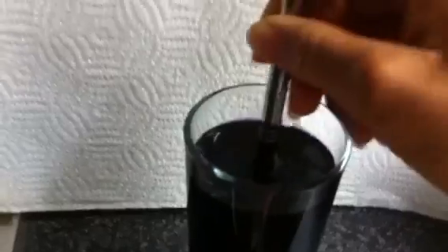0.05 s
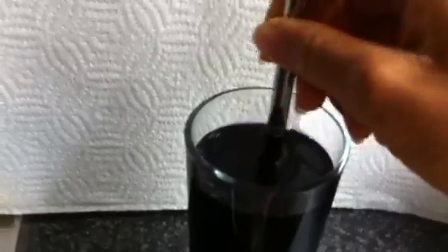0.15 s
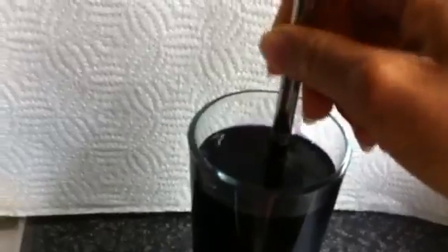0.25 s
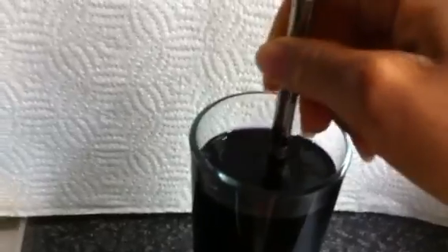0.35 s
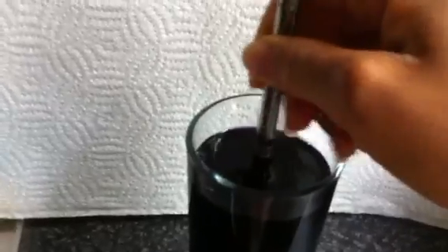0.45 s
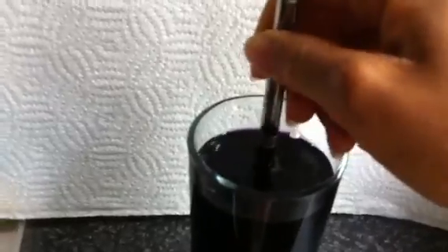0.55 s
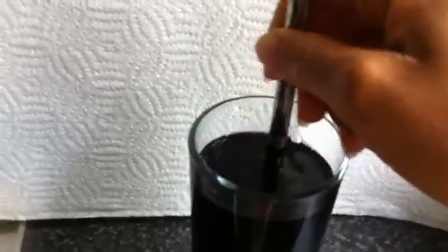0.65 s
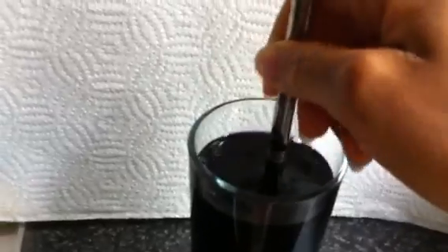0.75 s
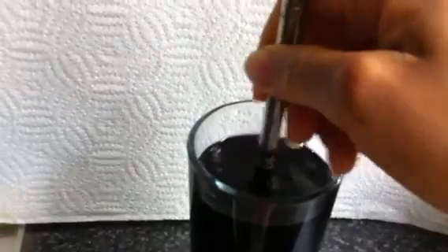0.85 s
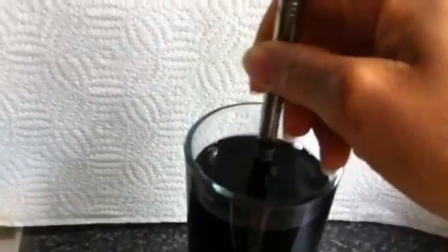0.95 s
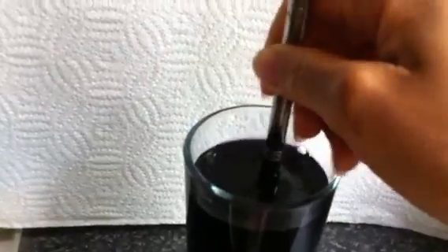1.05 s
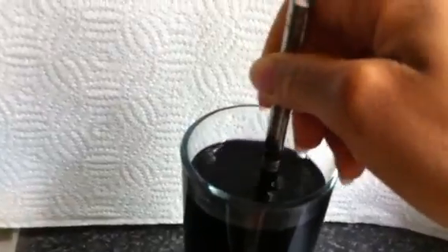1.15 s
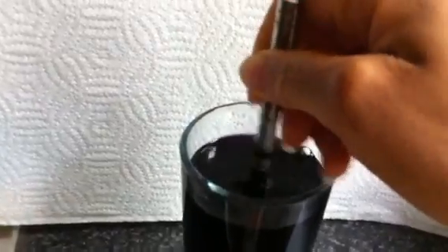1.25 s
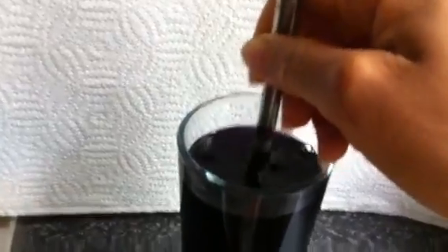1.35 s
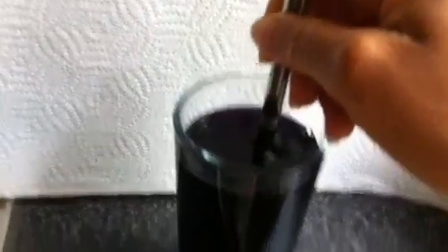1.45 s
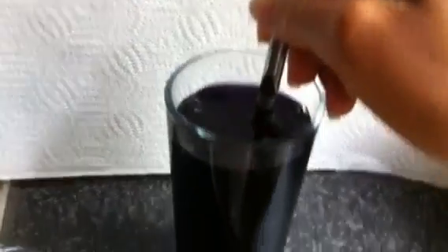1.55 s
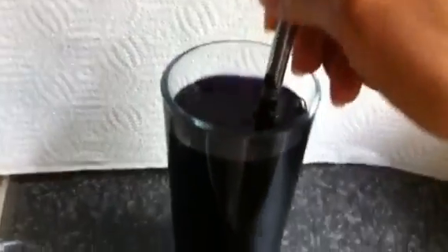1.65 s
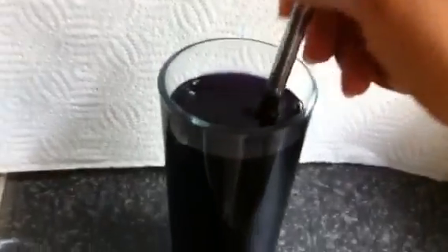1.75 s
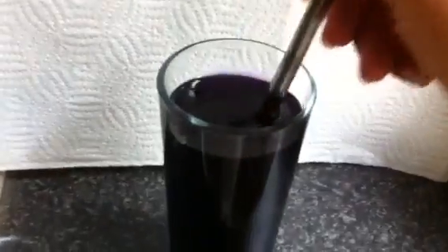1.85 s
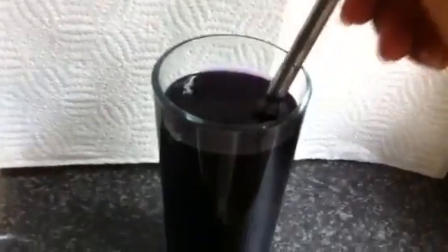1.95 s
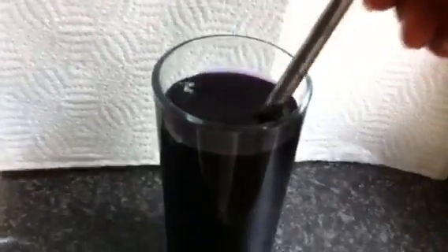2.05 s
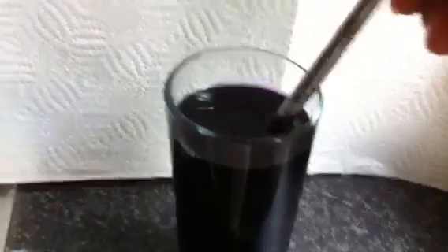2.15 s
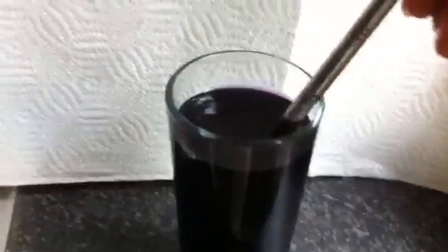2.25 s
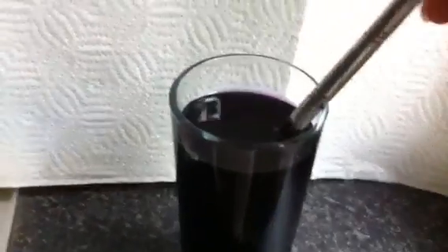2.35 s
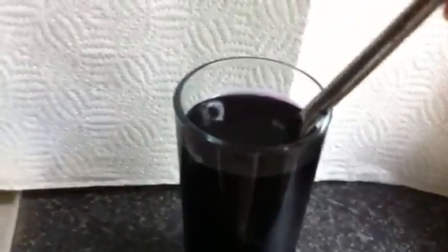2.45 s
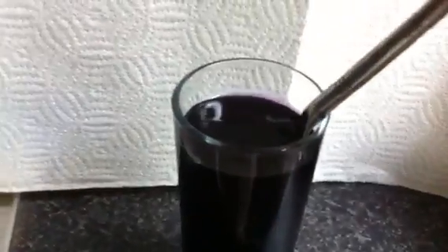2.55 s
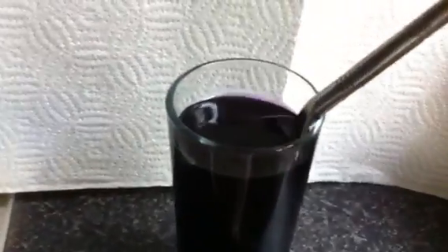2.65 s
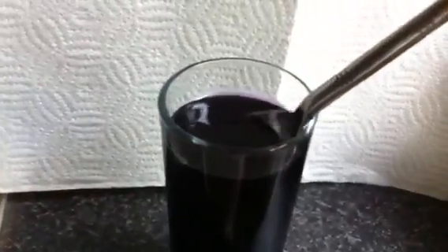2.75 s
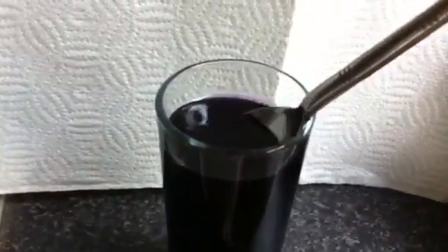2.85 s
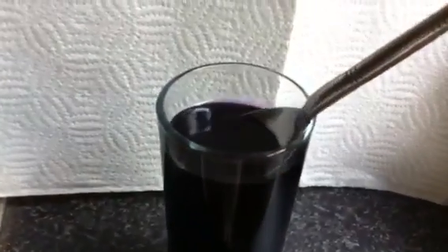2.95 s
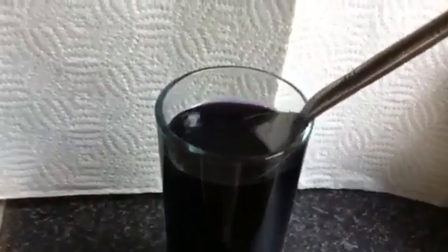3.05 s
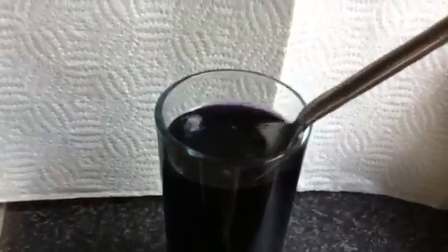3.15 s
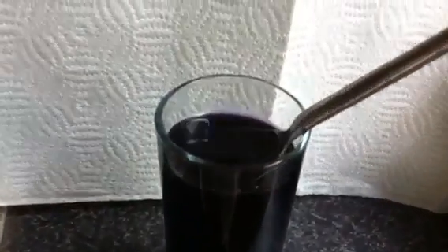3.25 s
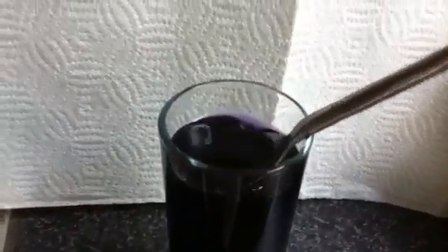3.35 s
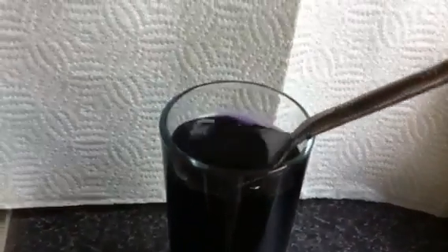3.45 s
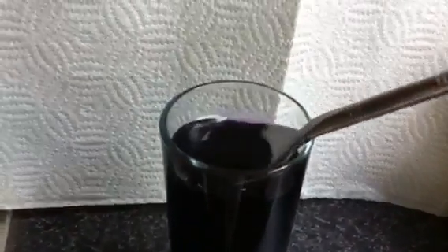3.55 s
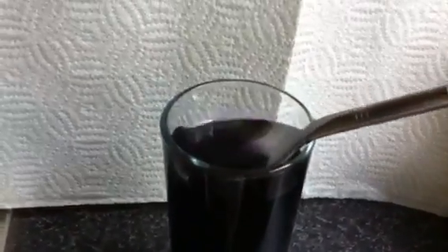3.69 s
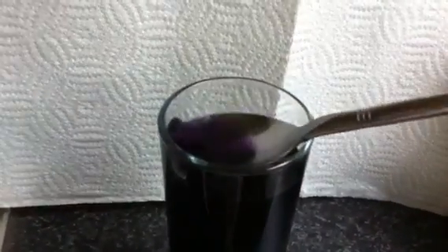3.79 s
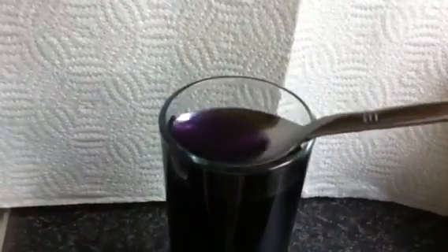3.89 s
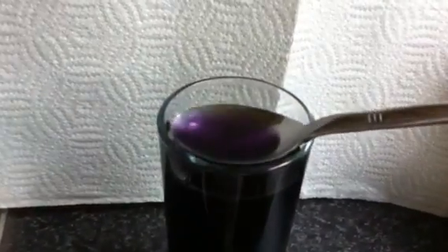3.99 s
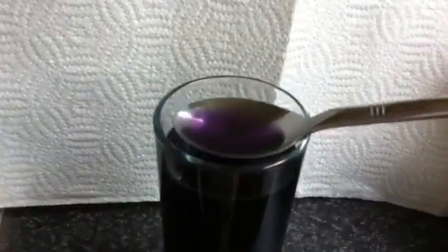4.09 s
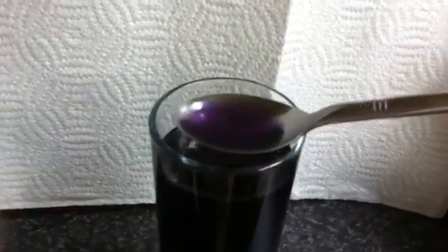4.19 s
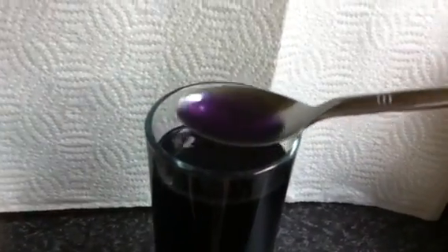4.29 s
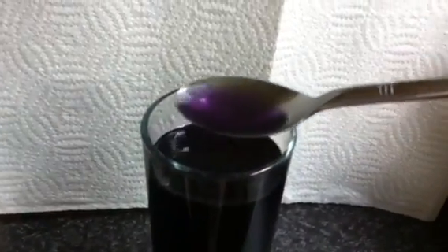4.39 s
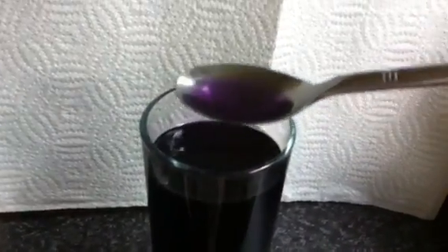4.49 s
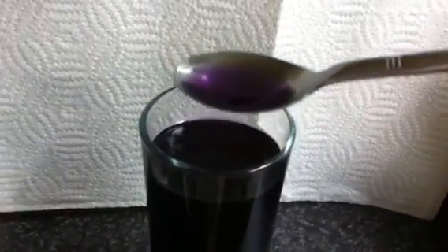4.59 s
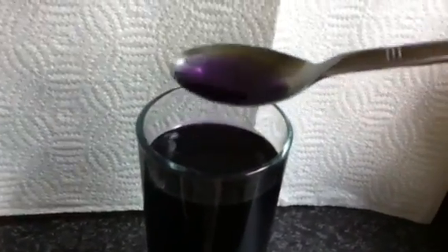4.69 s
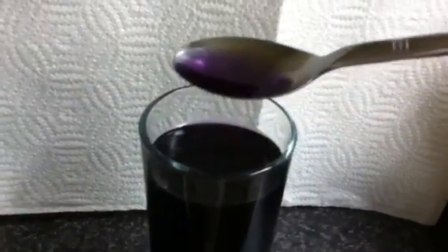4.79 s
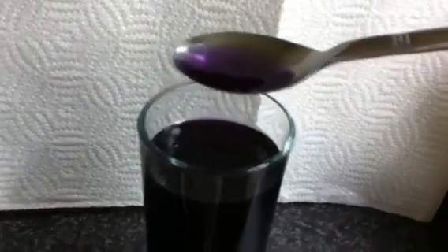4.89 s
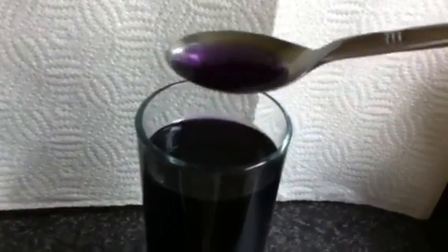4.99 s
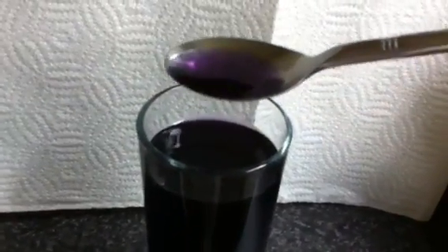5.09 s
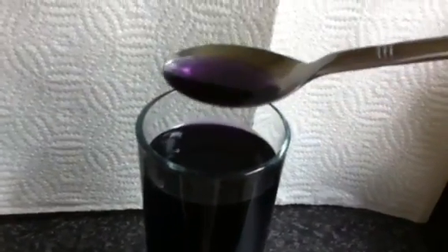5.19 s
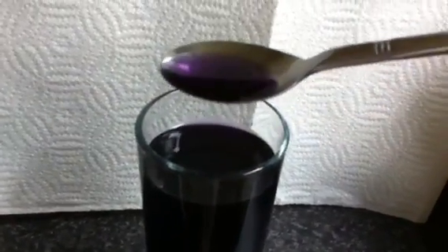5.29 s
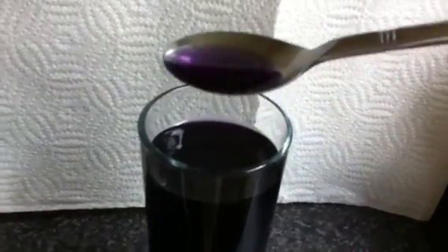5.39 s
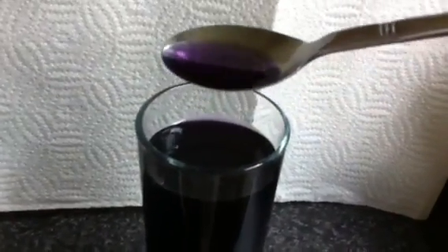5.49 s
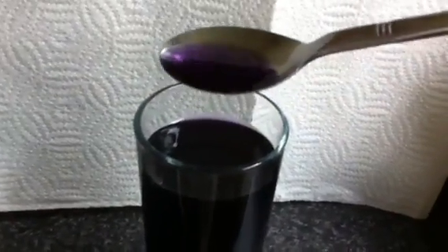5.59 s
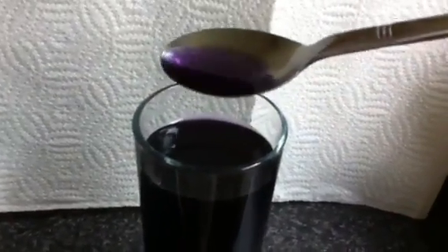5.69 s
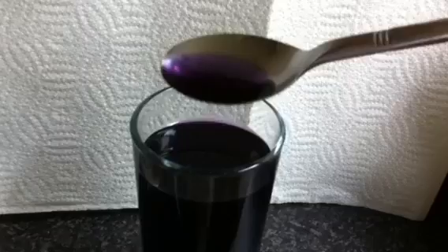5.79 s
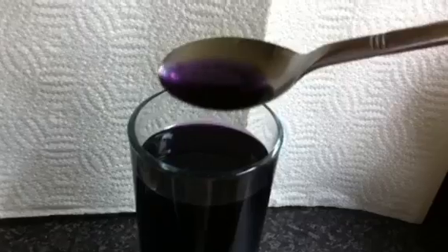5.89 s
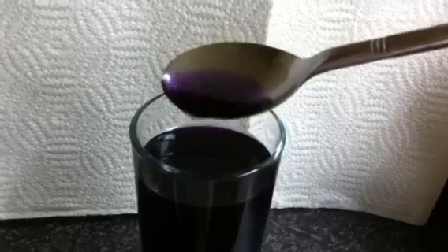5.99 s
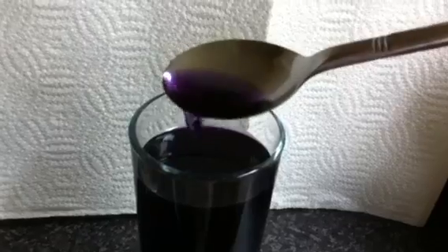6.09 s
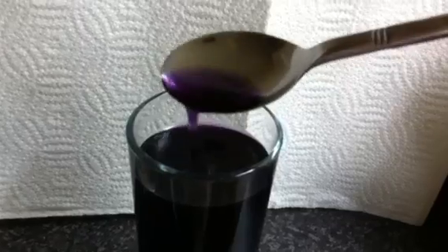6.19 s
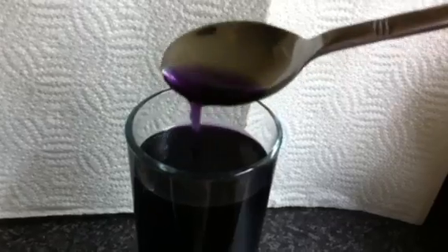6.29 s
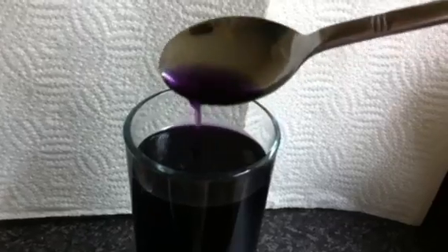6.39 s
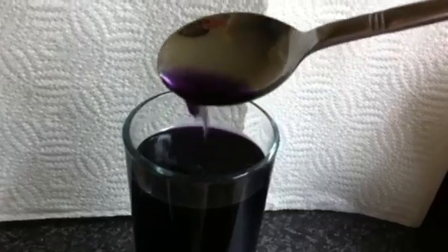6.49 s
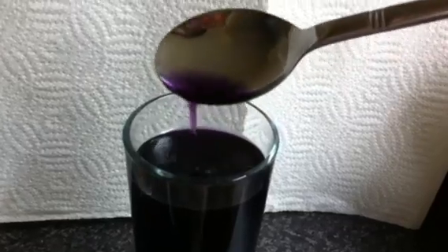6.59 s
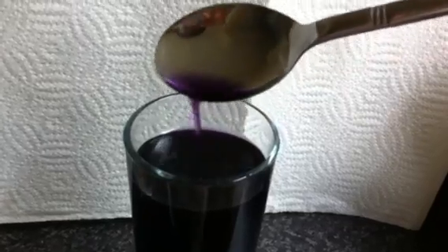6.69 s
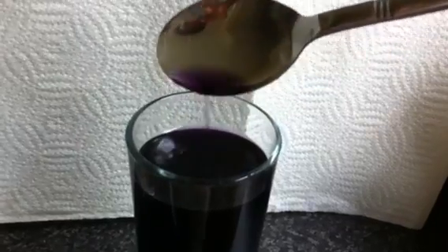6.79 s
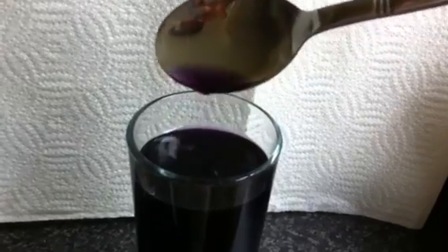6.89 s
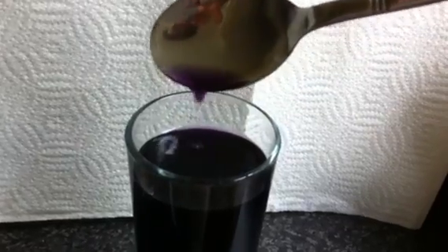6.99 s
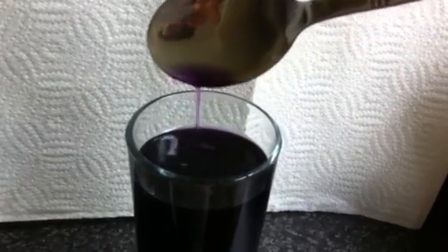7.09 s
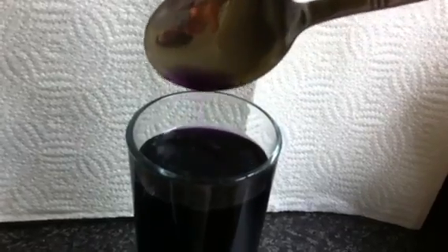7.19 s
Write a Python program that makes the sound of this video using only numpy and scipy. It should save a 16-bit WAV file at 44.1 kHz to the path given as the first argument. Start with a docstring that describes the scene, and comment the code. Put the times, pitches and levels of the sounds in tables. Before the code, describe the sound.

A metal spoon stirs a full glass with bright, quick clinks and scuffs, taps the rim as it lifts out, then three small drops plip.

```python
"""A steel spoon stirs a full drinking glass on a kitchen counter: each turn gives a clear clink and damped scuffs.
It is drawn out with soft swishes, tapping the rim; glass and bowl ring higher as the liquid sinks.
A soft bump follows, then three drops into the glass, each a splash and a rising bubble.
Glass and steel are damped modes, with filtered noise for contact. A small quiet room murmurs and hisses."""
import sys
import numpy as np
from scipy import signal
from scipy.fft import rfft, irfft, next_fast_len
from scipy.io import wavfile
from scipy.ndimage import map_coordinates

SR = 44100
rng = np.random.default_rng(int(sys.argv[2]) if len(sys.argv) > 2 else 0)


def int16_out(signal):
    """Quantize to a 16-bit WAV file."""
    q = np.round(np.clip(np.atleast_2d(signal).T, -1, 1) * 32767)
    wavfile.write(sys.argv[1], SR, q.astype(np.int16))


N = 319409
T = np.arange(SR) / SR  # one second, the length of every single sound

# free blows on the wall: start_s, force_db, low_mode_db
CLINKS = [(0.082, -6.5, -28.5), (0.5973, 1.5, -20), (1.0009, 6.5, -21), (1.4122, 0.5, -23)]
# spoon catches on the wall, slips, catches again: start_s, force_db, slip_s, second_force_db
DRAGS = [(0.294, 0.5, 0.037, -2), (0.727, -2.5, 0.034, 3.5), (1.150, -0.5, .030, 0.5),
         (1.531, 0.5, .065, -2.5)]
# spoon tip meets the thick base: start_s, force_db, high_mode_db
BUMPS = [(0.001, 1.5, -55), (0.445, 0, -36), (0.888, 1, -35.5), (1.243, -1.5, -34), (1.634, -0.5, -43)]
# taps on the rim: start_s, force_db, wall_ring_db, steel_ring_db
TAPS = [(2.364, 0, -27, -32), (2.428, -8, -25, -40), (2.481, -1.5, -47, -38), (2.515, -9, -35.5, -50.5),
        (2.630, -19.5, -44, -56.5), (2.668, -24, -53.5, -68), (3.285, -48, -64.5, -79),
        (3.521, 0.5, -44, -35.5), (3.655, -42, -66, -65), (3.940, 1, -45.5, -32), (4.195, -36.5, -65, -72)]
# glass wall, two singing modes and then overtones: pitch_hz, level_db, t60_s
GLASS_MODES = [(2255, 0, .55), (5426, 0, .26), (2405, -7, .16), (3208, -13, .09), (4775, -22, .15),
               (5470, -3, .14), (5790, -12, .16), (6160, -4, .12), (6225, 1, .13), (7866, -6, .13),
               (8525, 1, .14), (8715, -4, .18), (10305, -6, .18), (10483, -6, .18), (10660, -8, .13),
               (10960, -15, .15), (11450, -19, .15), (12315, -8, .2), (12443, -9, .2), (13175, -11, .14),
               (13410, -11, .13), (15250, -18, .12)]
# bending of the spoon handle: pitch_hz, level_db, t60_s
HANDLE_MODES = [(331.8, -5, .42), (343.1, -3, 0.15), (440, -10, .22)]
# worktop under the glass: pitch_hz, level_db, t60_s
COUNTER_MODES = [(138, -1, 0.32), (175.3, -7.5, 0.23), (242, -8, 0.28)]
# relative spectrum of the contact noise: frequency_hz, level_db
CRACK_SPECTRUM = [(100, -50.5), (700, -8), (1100, -3.5), (1500, 7.5), (1750, -3.5), (2300, 10.5),
                  (3000, -3.5), (4000, -9.5), (6200, -1), (7200, -1), (8500, 2), (9400, -12), (12500, -8),
                  (16000, -20)]
# relative spectrum of the dull knock: frequency_hz, level_db
KNOCK_SPECTRUM = [(25, -36.5), (105, -24.5), (132, -2.5), (200, -10), (290, -3.5), (440, 1.5), (610, 0.5),
                  (780, -10), (1300, -20), (3000, -46), (8000, -89.5)]


def amp(db):
    """Decibels to gain."""
    return 10 ** (np.asarray(db) / 20)


def unit(x):
    """Scale to rms 1."""
    return x / np.sqrt(np.mean(x ** 2) + 1e-20)


def along(points, hz):
    """Interpolate (Hz, value) points on a log frequency axis."""
    point_hz, values = np.transpose(points)
    return np.interp(np.log(hz + 1), np.log(point_hz), values)


def fade(t60_s):
    """Exponential decay, 60 dB down at t60_s."""
    return np.exp(-np.log(1000) * T / t60_s)


def swell(rise_s):
    """Soft start, an exponential approach to 1."""
    return 1 - np.exp(-T / rise_s)


def add(track, start_s, sound):
    """Mix a sound into the track at start_s."""
    start = max(round(start_s * SR), 0)
    track[start:start + len(sound)] += sound[:N - start]


def noise(spectrum, size=SR):
    """Coloured noise of rms 1."""
    hz = np.fft.rfftfreq(size, 1 / SR)
    white = rfft(rng.standard_normal(size))
    return unit(irfft(white * amp(along(spectrum, hz)), size))


def ring(modes, pitch=1, spread_db=2):
    """Damped modes whose balance scatters as the striking spot varies."""
    hz, db, t60_s = np.transpose(modes)[:, :, None]
    t = T[:SR // 2]
    gain = amp(db + spread_db * rng.standard_normal(db.shape)) / np.linalg.norm(amp(db))
    waves = gain * np.sin(2 * np.pi * hz * pitch * t) * np.exp(-np.log(1000) * t / t60_s)
    return np.pad(waves.sum(0), (0, SR - len(t)))


def chatter(modes, width_hz, t60_s, grain):
    """Steel rattling on glass: tiny uneven impacts into modes that the contact broadens."""
    f = np.fft.rfftfreq(SR, 1 / SR)
    body = sum(amp(db) * 1j * f * width_hz / (hz * hz - f * f + 1j * f * width_hz)
               for hz, db, _ in modes)
    body_rms = np.sqrt(np.mean(abs(body) ** 2))
    # impact strength steps every 30 samples
    sizes = np.exp(grain * rng.standard_normal(SR // 30 + 1)).repeat(30)[:SR]
    impacts = unit(rng.standard_normal(SR) * sizes)
    return irfft(rfft(impacts * fade(t60_s)) * body / body_rms, SR)


def sing(mode, rise_s, twin_db, beat_hz, pitch=1):
    """A mode swells and beats with its twin, as nothing is quite symmetric."""
    hz, db, t60_s = mode
    phase = 2 * np.pi * hz * pitch * T
    drift = 2 * np.pi * beat_hz * (1 + 0.16 * rng.standard_normal()) * T
    pair = np.sin(phase) + amp(twin_db) * np.sin(phase + drift)
    return amp(db) * pair * fade(t60_s) * swell(rise_s)


def room(x, wet_db, near_db):
    """Add eight early reflections from counter and wall, and a tail whose decay varies with frequency."""
    # tail decay: frequency_hz, t60_s
    tail_decay = [(150, .5), (500, .42), (2300, 0.29), (6000, .28), (14000, 0.12)]
    hz, t, z = signal.stft(rng.standard_normal(SR // 2), SR, nperseg=256)
    decay = np.exp(-np.log(1000) * t / along(tail_decay, hz)[:, None])
    tail = signal.istft(z * decay, SR, nperseg=256)[1]
    tail = np.pad(tail / np.linalg.norm(tail), (SR // 150, 0))
    response = amp(wet_db) * tail
    arrivals = rng.integers(SR // 600, SR // 60, size=8)
    response[arrivals] += amp(near_db) * rng.choice([-1, 1], size=8)
    return x + signal.fftconvolve(x, response)[:len(x)]


def until_touched(start_s, t60_s=0.039):
    """The next touch of the spoon stops the wall's ring."""
    touches = [row[0] for row in CLINKS + DRAGS + BUMPS + TAPS]
    touches = np.array(touches + [drag_s + slip_s for drag_s, _, slip_s, _ in DRAGS])
    free_s = np.min(touches[touches > start_s] - start_s, initial=1)
    return np.exp(-np.log(1000) * np.maximum(T - free_s, 0) / t60_s)


def clinks():
    """The spoon strikes and rebounds, so the glass rings freely; force goes mostly into the high singing mode."""
    out = np.zeros(N)
    for start_s, force_db, low_db in CLINKS:
        low = amp(low_db) * sing(GLASS_MODES[0], rise_s=0.015, twin_db=-6, beat_hz=2.4)
        # the wall loses energy fast while the steel still touches it
        contact = 1 + amp(-2) * fade(0.05)
        high = sing(GLASS_MODES[1], rise_s=0.003, twin_db=-8.5, beat_hz=3.57)
        high = amp(-15.5 + force_db) * contact * high
        overtones = amp(-4.0) * ring(GLASS_MODES[2:], spread_db=0.5)
        overtones += amp(1.5) * chatter(GLASS_MODES[2:], width_hz=59, t60_s=0.038, grain=0.37)
        crack = amp(-8) * noise(CRACK_SPECTRUM) * fade(0.026)
        knock = noise(KNOCK_SPECTRUM) * fade(0.075) + amp(-1.5) * ring(HANDLE_MODES)
        knock = amp(-39.5 + 0.25 * force_db) * knock * swell(0.002)
        strike = amp(-18.5 + 0.3 * force_db) * (overtones + crack) + knock
        add(out, start_s, room((low + high) * until_touched(start_s), wet_db=-17.5, near_db=-32))
        add(out, start_s, room(strike, wet_db=-6.0, near_db=-20))
    return out


def scuffs():
    """A drag bends the handle and its second catch is more damped; a bump goes down into the counter."""
    out = np.zeros(N)
    for start_s, force_db, slip_s, second_db in DRAGS:
        add(out, start_s, scuff(start_s, force_db, treble_db=-25.5, low_db=-36.0, high_db=-30.5,
                                knock_db=-43.0, handle_db=-30.5, beat_hz=7.9))
        second_s = start_s + slip_s
        add(out, second_s, scuff(second_s, second_db, treble_db=-28.5, low_db=-32.0, high_db=-47.5,
                                 knock_db=-47, handle_db=-41.5, beat_hz=11.0))
    for start_s, force_db, high_db in BUMPS:
        add(out, start_s, scuff(start_s, force_db, treble_db=-29.5, low_db=-41.0, high_db=high_db,
                                knock_db=-35.0, handle_db=-48.5, beat_hz=6.5))
    return out


def scuff(start_s, force_db, treble_db, low_db, high_db, knock_db, handle_db, beat_hz):
    """The spoon stays on the wall: it chatters, loads the glass and sets its own handle humming."""
    # spoon pressed to the wall under the liquid: pitch_hz, level_db, t60_s
    wedged_modes = [(1085, -12, 0.41), (1985.5, -9, 0.2), (2408, -7.5, .1), (3210, -14, 0.33),
                    (4740, -16, .2), (5170, -4.5, 0.12), (6200, -1, 0.076), (6100, -3.5, 0.048),
                    (8350, 0.5, 0.0993), (8680, 5, 0.051), (10130, 1, .13), (10600, -2.5, 0.033),
                    (12700, -1, .12), (12410, -3.5, .1), (13300, -9.5, 0.11), (14130, -13, .12),
                    (15600, -14, .1)]
    low = amp(low_db) * sing(GLASS_MODES[0], rise_s=0.012, twin_db=-5, beat_hz=beat_hz)
    high = sing(GLASS_MODES[1], rise_s=0.001, twin_db=-10, beat_hz=-22, pitch=0.999)
    high = amp(high_db + force_db) * high
    handle = amp(handle_db + force_db) * ring(HANDLE_MODES, spread_db=2.5) * swell(0.0058)
    # every point of contact shifts each mode differently
    detune = 1 + 0.006 * rng.standard_normal((len(wedged_modes), 1))
    drag = chatter(wedged_modes, width_hz=150, t60_s=0.085, grain=0.8)
    rattle = amp(-7) * ring(wedged_modes, pitch=detune, spread_db=5) + amp(-4) * drag
    # uneven slipping, 300 random levels per second, smoothly joined
    slips = np.exp(0.5 * map_coordinates(rng.standard_normal(304), [300 * T]))
    scrape = amp(-8.0) * noise(CRACK_SPECTRUM) * unit(slips) * fade(0.07)
    knock = noise(KNOCK_SPECTRUM) * fade(0.17) + amp(-8.5) * ring(COUNTER_MODES)
    knock = amp(knock_db) * knock
    singing = room((low + high) * until_touched(start_s) + handle, wet_db=-11.5, near_db=-26.0)
    treble = amp(treble_db) * (rattle + scrape) * until_touched(start_s, t60_s=0.02)
    contact = room((treble + knock) * swell(0.0016), wet_db=-11, near_db=-22.0)
    return singing + amp(force_db) * contact


def taps():
    """The spoon knocks and bounces on the rim; as it leaves, the liquid sinks and glass and bowl ring higher."""
    # spoon bowl clear of the liquid, main mode first: pitch_hz, level_db, t60_s
    bowl_modes = [(5942, 5, 0.13), (4450, -22, 0.21), (6115, -2, 0.071), (6540, -8, 0.044),
                  (7330, -5.5, 0.043), (7461, -16, .15), (8770, -10.5, .13), (8810, -7, 0.2),
                  (10400, -13, 0.098), (10000, -25, .1), (10760, 1.5, 0.053), (12440, -12, .12),
                  (14130, -14, .13), (15200, -25, .12)]
    # rim stopped by the steel on it: pitch_hz, level_db, t60_s
    clack_modes = [(2169, -7, 0.035), (2366, 0.5, 0.064), (2396, 3, 0.027), (2463, 0.5, 0.03),
                   (2825, -4, 0.023), (2990, -7, 0.018), (3865, -21, 0.027)]
    bounce_s, bounce_scatter = 0.0073, 0.05  # mean spacing; share by which it varies
    crack_spectrum = [(300, -10), (700, -9), (1500, 3), (2400, -5.5), (3800, 1.5), (4800, -5.5),
                      (7000, -2), (15000, -34)]
    tilt_db = [(4500, -7), (7400, 9.5), (10500, -10.5), (15000, -5)]
    out = np.zeros(N)
    for start_s, force_db, ring_db, steel_db in TAPS:
        lifted = lift(start_s)
        low = amp(ring_db) * sing(GLASS_MODES[0], rise_s=0.0094, twin_db=-32, beat_hz=2.6,
                                  pitch=1.001 + 0.02 * lifted)
        high = sing(GLASS_MODES[1], rise_s=0.00074, twin_db=-9, beat_hz=22,
                    pitch=1.001 + 0.0046 * lifted)
        high = amp(-36 + force_db - 9.6 * lifted) * high
        bowl = sing(bowl_modes[0], rise_s=0.001, twin_db=-10.5, beat_hz=55,
                    pitch=1 - 0.0198 * (1 - lifted))
        bowl = amp(steel_db - 3.5 + 3.8 * lifted) * bowl
        knock = noise(KNOCK_SPECTRUM) * fade(0.16)
        knock += amp(-15.5 + 13.3 * lifted) * ring(COUNTER_MODES)
        knock += amp(-4) * ring(HANDLE_MODES)
        knock = amp(-46.0 + 0.53 * force_db - 4.7 * lifted) * knock * swell(0.0021)
        singing = (low + high) * until_touched(start_s, t60_s=0.044)
        add(out, start_s, room(singing + bowl + knock, wet_db=-8.5, near_db=-19))
        # the contact moves from the neck to the bowl, which changes the balance of its modes
        modes = [(hz, db + (lifted - 0.5) * along(tilt_db, hz), t60_s) for hz, db, t60_s in bowl_modes]
        for bounce in range(3):  # the tap itself, then two bounces
            rattle = amp(-5.5) * chatter(modes, width_hz=130, t60_s=0.024, grain=0.46) + ring(modes[1:])
            rattle = amp(steel_db - 2.2 * bounce) * rattle * swell(0.0015)
            crack = amp(-17) * noise(crack_spectrum) * fade(0.048)
            # the free bowl clacks harder than the neck, and its bounces die sooner
            clack_db = -22.0 + force_db + 5.3 * lifted - (8.0 + 5.4 * lifted) * bounce
            clack = amp(clack_db) * (ring(clack_modes, spread_db=2.0) + crack) * swell(0.0013)
            flight_s = bounce_s * (1 + bounce_scatter * rng.standard_normal())
            add(out, start_s + flight_s * bounce, room(rattle + clack, wet_db=-10.5, near_db=-21.5))
    return out


def lift(time_s):
    """How far the spoon's bowl is out of the liquid, 0-1."""
    # withdrawal of the spoon: time_s, share_above_liquid
    withdrawal = [(2.6, 0.009), (3.55, 0.98)]
    return np.clip(np.interp(time_s, *np.transpose(withdrawal)), 0, 1)


def slides():
    """Noise swishes that swell and fade as the spoon slides up through the liquid and over the rim."""
    # Gaussian swishes: centre_s, level_db, half_length_s
    strokes = [(2.045, -69, 0.12), (2.682, -64, 0.059), (3.656, -61, 0.024)]
    spectrum = [(200, -29), (600, -2.5), (850, 6), (1100, 8.0), (1600, -15), (2400, -14),
                (4000, -33), (12000, -27)]
    t = np.arange(N) / SR
    speed = sum(amp(db) * np.exp(-((t - centre_s) / half_s) ** 2) for centre_s, db, half_s in strokes)
    return speed * noise(spectrum, size=N)


def drips():
    """Each drop lands with a faint small bubble, then its cavity closes on the main one."""
    # drops into the glass: main_bubble_s, bubble_db, bubble_start_hz, splash_db
    drops = [(6.312, -28, 2025, -65), (6.727, -45, 4300, -49.5), (6.986, -52.5, 7570, -53)]
    cavity_s = 0.011  # from landing to main bubble
    out = np.zeros(N)
    for start_s, db, hz, splash_db in drops:
        add(out, start_s - cavity_s, plip(db - 23, 1.4 * hz, splash_db - 6))
        add(out, start_s, plip(db, hz, splash_db))
    return out


def plip(db, start_hz, splash_db):
    """A noise splash and a trapped bubble, a sine whose pitch climbs as it dies."""
    splash_spectrum = [(800, -27.5), (3000, -5), (7500, 9.0), (10000, -2), (15000, -6)]
    glide = 1 + 0.026 * swell(0.0098)
    bubble = np.sin(2 * np.pi * start_hz * np.cumsum(glide) / SR)
    bubble = amp(db) * bubble * fade(0.03) * swell(0.00094)
    splash = amp(splash_db) * noise(splash_spectrum) * fade(0.015)
    return room(bubble + splash, wet_db=-13.0, near_db=-34)


def background():
    """Low room murmur with a slightly flickering hiss, and one soft bump, all filtered noise."""
    # relative spectrum of the room: frequency_hz, level_db
    air_spectrum = [(25, -23.5), (90, -28.5), (130, -5), (210, -2.5), (300, -6), (450, -12), (750, -13),
                    (1000, -10.5), (1400, -16), (2500, -17), (5000, -21), (9000, -23), (15800, -23.5)]
    bump_spectrum = [(40, -30), (120, 7), (220, 8), (400, -26), (2000, -60)]
    # one random level per 1000 samples, smoothly joined
    flicker = map_coordinates(rng.standard_normal(N // 1000 + 4), [np.arange(N) / 1000])
    air = noise(air_spectrum, size=N)
    hiss = signal.sosfilt(signal.butter(1, 2500, "high", fs=SR, output="sos"), air)
    out = amp(-66.5) * (air + hiss * (amp(1.1 * flicker) - 1))
    add(out, 4.985, amp(-53.0) * noise(bump_spectrum) * fade(0.097))
    return out


def scene():
    """Everything at one close microphone; such small objects radiate little bass."""
    high_pass = signal.butter(1, 90, "high", fs=SR, output="sos")
    spoon = signal.sosfilt(high_pass, clinks() + scuffs() + taps())
    return (spoon + slides() + drips() + background())[None]


def record(dry):
    """Steep low-pass: the recorder keeps nothing above its band limit."""
    top_hz = 16000
    size = next_fast_len(N + SR // 2)
    hz = np.fft.rfftfreq(size, 1 / SR)
    return irfft(rfft(dry, size) / (1 + (hz / top_hz) ** 160), size)[:, :N]


dry = scene()
out = record(dry)
int16_out(out)
```